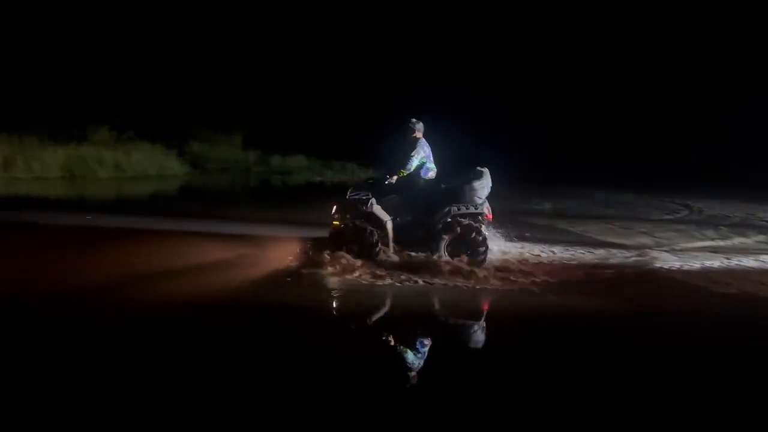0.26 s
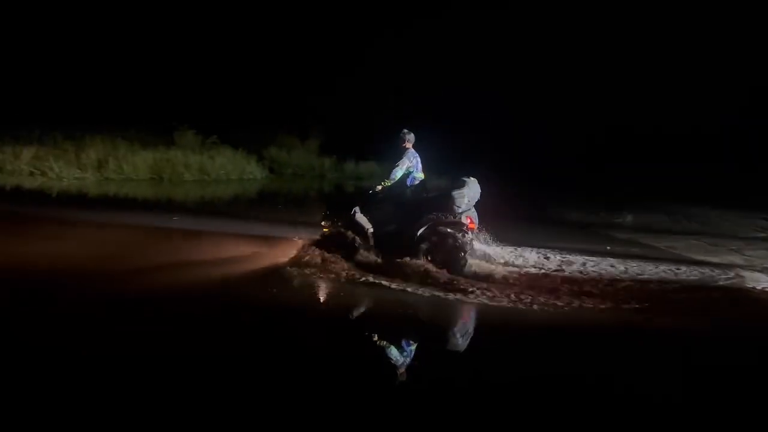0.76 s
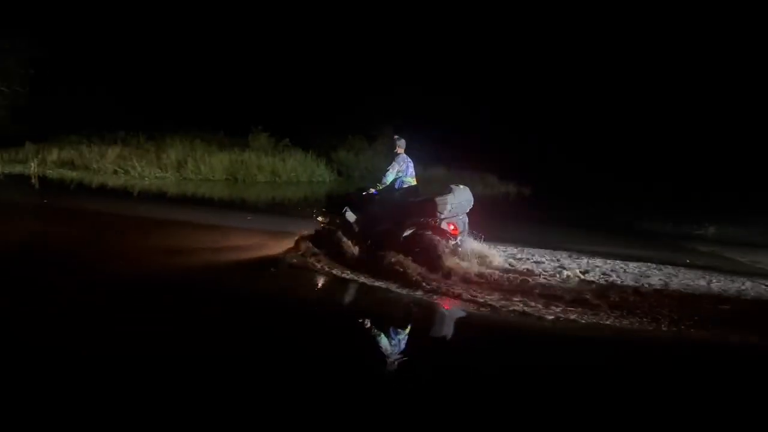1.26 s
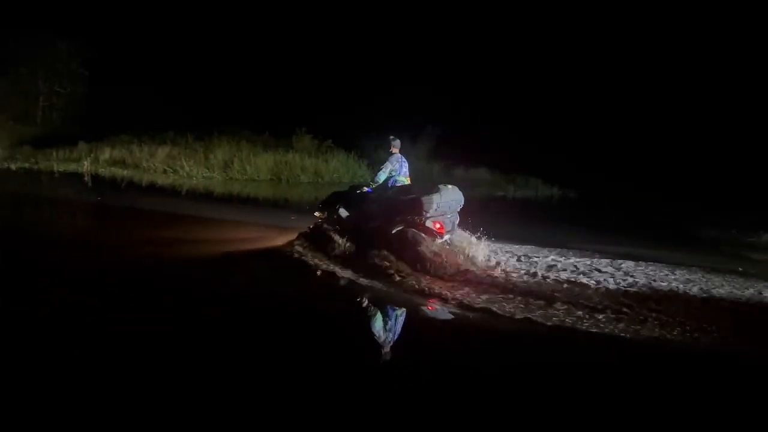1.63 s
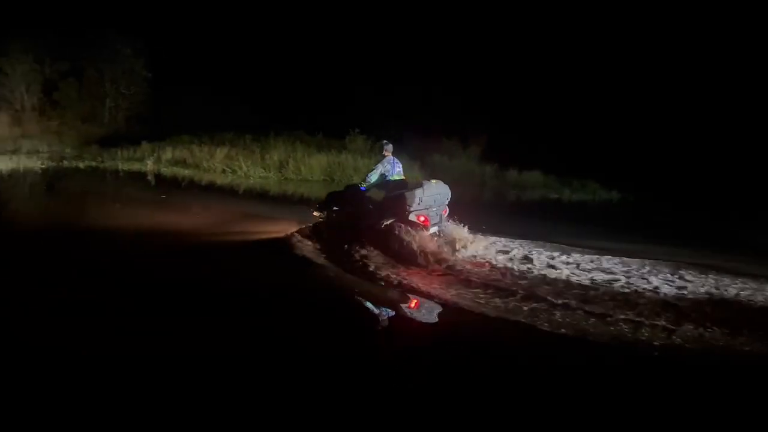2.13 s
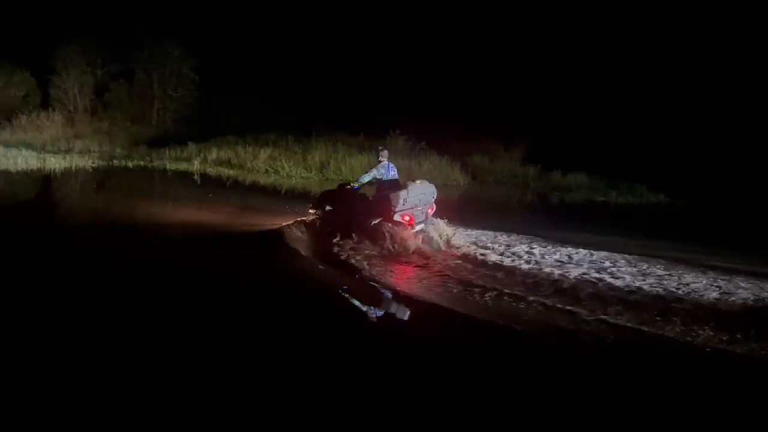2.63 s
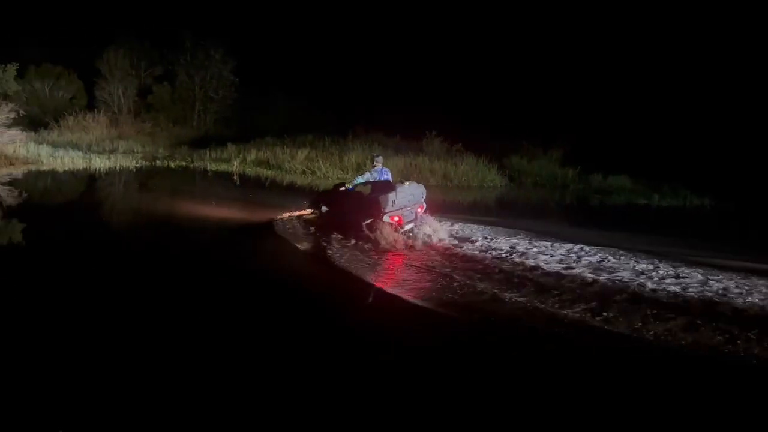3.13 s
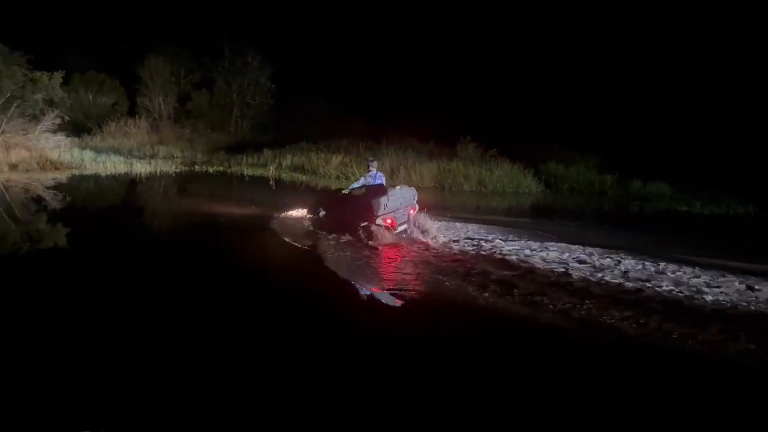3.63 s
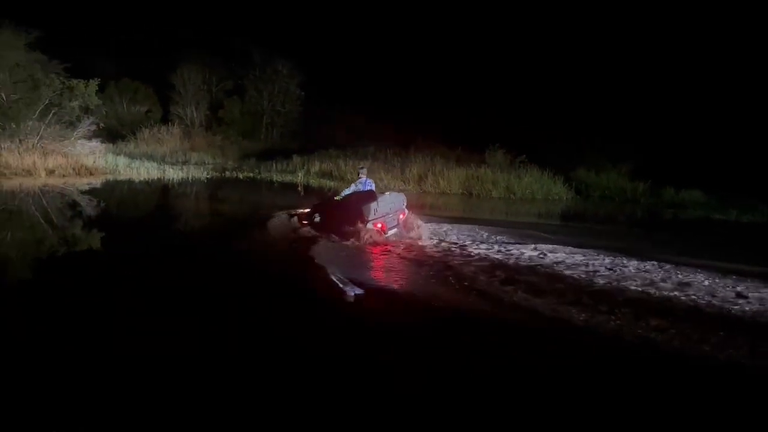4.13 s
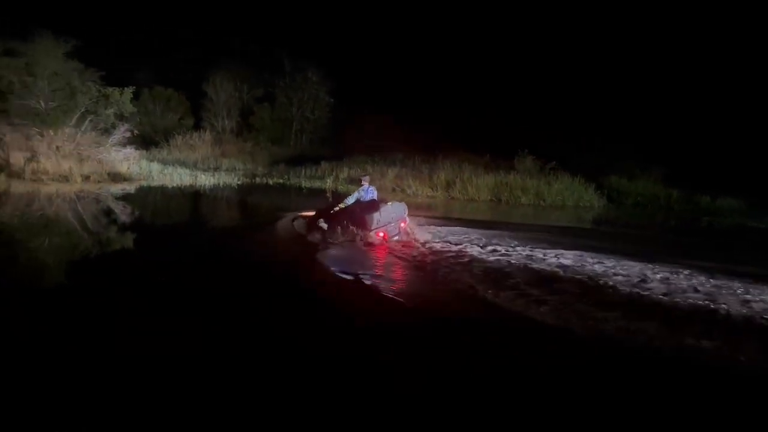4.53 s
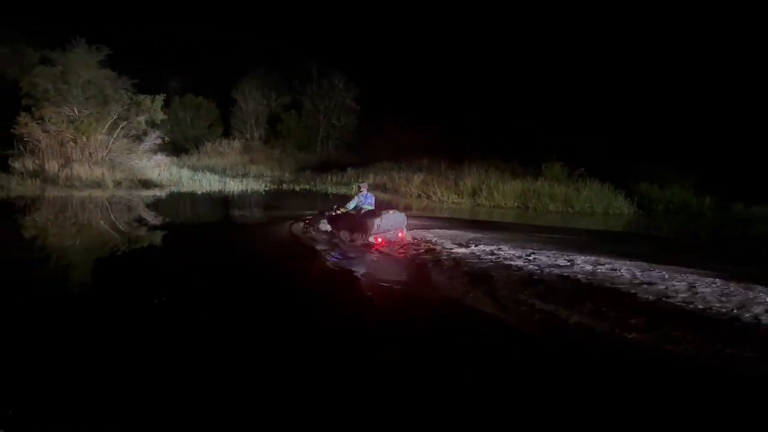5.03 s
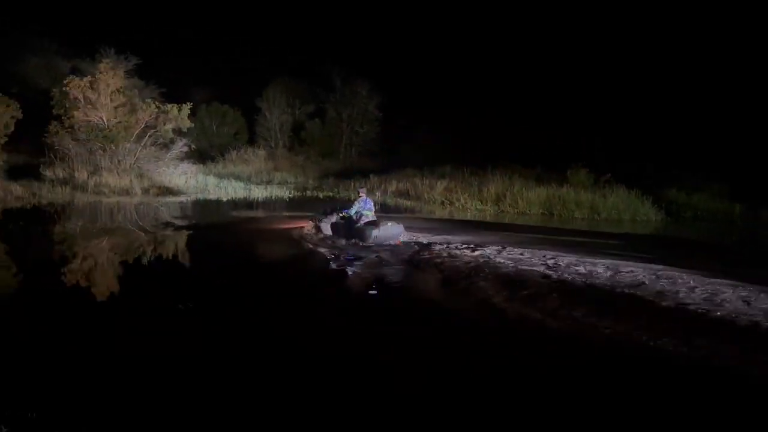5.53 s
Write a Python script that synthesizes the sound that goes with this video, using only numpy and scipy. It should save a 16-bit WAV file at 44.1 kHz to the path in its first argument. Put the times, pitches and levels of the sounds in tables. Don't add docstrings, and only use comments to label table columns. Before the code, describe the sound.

A single-cylinder quad bike throbs and churns through shallow pond water at night, turns away, revs up and fades into the distance.

```python
import sys
import numpy as np
from scipy import signal
from scipy.fft import rfft, irfft
from scipy.io import wavfile
from scipy.ndimage import uniform_filter1d

SR = 44100
rng = np.random.default_rng(int(sys.argv[2]) if len(sys.argv) > 2 else 0)


def invert_db(x):
    u = np.asarray(x, float) / 20
    return 10 ** u


def dump_mix(stems):
    frames = np.atleast_2d(stems).T
    limited = np.clip(frames, -1, 1)
    pcm = np.round(limited * 32767).astype(np.int16)
    wavfile.write(sys.argv[1], SR, pcm)


N = 254280
T = np.arange(N) / SR
STRIDE = 8


def read(points, hz):
    f, value = np.transpose(points)
    return np.interp(np.log(hz + 1), np.log(f + 1), value)


def curves(rows):
    s, *columns = np.transpose(rows)
    return [np.interp(T, s, c) for c in columns]


def evened(x):
    return x / np.sqrt(np.mean(x ** 2) + 1e-20)


def drift(top_hz, at=T):
    t = T[::64]
    slow = 0
    for f in np.geomspace(top_hz / 8, top_hz, 16):
        slow = slow + np.sin(2 * np.pi * (f * t + rng.random())) / np.sqrt(f)
    return np.interp(at, t, evened(slow))


def wash(spectrum, lo_hz, hi_hz, patchy_db, gust_db):
    frames, hz = N // 128 + 5, np.fft.rfftfreq(512, 1 / SR)
    a, b, c, d, patches = rng.standard_normal((frames, len(hz), 5)).T
    patches = uniform_filter1d(patches, size=8, axis=0)
    patches = evened(uniform_filter1d(patches, size=30, axis=1))
    gusts = evened(uniform_filter1d(rng.standard_normal(frames), size=24))
    z = np.array([a + 1j * b, c + 1j * d]) * invert_db(patchy_db * patches + gust_db * gusts)
    white = rfft(signal.istft(z, nperseg=512, noverlap=384)[1][:, :N])
    hz = np.fft.rfftfreq(N, 1 / SR)
    shaped = white * invert_db(read(spectrum, hz))
    inside = irfft(shaped[0] * (hz > lo_hz) * (hz < hi_hz), N)
    return irfft(shaped, N) / inside.std()


def order(turns, k, db, waver_db, waver_rad):
    at = T[::STRIDE]
    phase = 2 * np.pi * (k * turns + rng.random()) + waver_rad * drift(top_hz=9.0, at=at)
    strength = invert_db(db + waver_db * drift(top_hz=14.0, at=at))
    return np.sqrt(2) * strength * np.cos(phase)


def night():
    # (frequency [Hz], level [dB per Hz])
    night_spectrum = [(200, -21), (600, 1), (1200, -0.5), (2000, -10), (4000, -28.5), (9500, -31.5),
                      (11100, -10), (12000, -29.5)]
    lap = wash(night_spectrum, 400, 1500, patchy_db=1.3, gust_db=0.0)[0]
    return invert_db(-43.5) * lap * np.array([[1], [-1]])


def insects():
    whistle_hz, whistle_db = 6080, -57.5
    pole = np.exp(-np.pi * 260 / SR)
    sides = []
    for side_db in (1.5, -1.5):
        noise = rng.standard_normal(N) + 1j * rng.standard_normal(N)
        band = signal.lfilter([1], np.convolve([1, -pole], [1, -pole]), noise)
        pitch_hz = whistle_hz + 60 * drift(top_hz=13.0)
        carrier = np.exp(2j * np.pi * np.cumsum(pitch_hz) / SR)
        throb = invert_db(whistle_db + side_db + 2.0 * drift(top_hz=18.0))
        sides.append(throb * evened((band * carrier).real))
    return np.array(sides)


def idler():
    idle_hz = 12.6
    # (order [multiple of the turning rate], level [dB])
    idle_orders = [(4, -46.5), (5, -48.5), (6, -35.5), (7, -32), (8, -40.5), (9, -44.5), (10, -37),
                   (11, -61.5)]
    turns = np.cumsum(idle_hz * (1 + 0.0049 * drift(top_hz=1.433)))[::STRIDE] / SR
    engine = sum(order(turns, k, db, waver_db=2.5, waver_rad=0.22) for k, db in idle_orders)
    return signal.resample_poly(engine, STRIDE, 1)[:N]


def pipe_hiss(turns):
    # (frequency [Hz], level [dB per Hz])
    hiss_spectrum = [(3500, -27), (5000, -10), (6000, 3.5), (6900, -2.5), (8200, 4.5), (9300, -5),
                     (10600, 2), (11400, -10), (11900, -8.5)]
    beam_s, rise_s, hold_s = 4.03, 0.81, 0.12
    side_db, beam_db, gone_db_per_s = -52, 9.5, 13.5
    beam = np.exp(-(np.minimum(T - beam_s, 0) / rise_s) ** 2)
    hiss_db = side_db + beam_db * beam - gone_db_per_s * np.maximum(T - beam_s - hold_s, 0)
    hiss = invert_db(hiss_db - 4.0) * wash(hiss_spectrum, 7700, 9500, patchy_db=1.5, gust_db=1.6)
    puff = np.exp(1.0 * np.cos(2 * np.pi * (turns + 0.17)))
    load = np.clip(0.15 + beam, 0.05, 1)
    return hiss, hiss * 0.29 * load * (puff / puff.mean() - 1)


def water(turns):
    # (time [s], distance [m])
    bike_distance = [
        (0, 10.1),
        (1.2, 9.6),
        (2.4, 12.1),
        (3.9, 17.8),
        (4.5, 21),
        (5.0, 32),
        (5.77, 31.3),
    ]
    # (frequency [Hz], level [dB per Hz])
    rumble_spectrum = [(35, -40), (50, -12), (62, -0.5), (100, -3), (180, -4.5), (260, -12), (400, -11),
                       (520, -27.5), (700, -62)]
    churn_spectrum = [(300, -12.5), (480, -12), (620, -1), (750, -0.5), (1000, 0.5), (1200, -7.5),
                      (1450, -5), (1800, -31.5), (3000, -45)]
    spray_spectrum = [(600, -3.5), (1000, 6), (1300, 0), (1900, 0), (2300, 4), (2700, 0), (3500, 0.5),
                      (5000, -5.5), (7000, -10.5), (10500, -14), (12000, -18)]
    doublings = np.log2(curves(bike_distance)[0] / 10)
    rumble_gain = invert_db(-35.5 - 0.5 * doublings)
    churn_gain = invert_db(-34.5 - 4.5 * doublings)
    spray_gain = invert_db(-38.5 - 7 * doublings)
    rumble = rumble_gain * wash(rumble_spectrum, 300, 450, patchy_db=0.9, gust_db=1.5)
    churn = churn_gain * wash(churn_spectrum, 520, 1500, patchy_db=2.0, gust_db=-0.4)
    spray = spray_gain * wash(spray_spectrum, 2155, 3530, patchy_db=1.03, gust_db=0.31)
    hiss, puffs = pipe_hiss(turns)
    slosh = invert_db(0.3 * drift(top_hz=12.0))
    return rumble + churn + (spray + hiss) * slosh + puffs


def gulped():
    # (time [s], half length [s], change [dB])
    pipe_gulps = [
        (4.602, .03, -14.5),
        (4.743, .04, -8.5),
        (4.84, 0.057, 4),
    ]
    return sum(db * np.exp(-((T - s) / half) ** 2) for s, half, db in pipe_gulps)


def exhaust(rate):
    # (order [multiple of the firing rate], level [dB])
    side_on_orders = [(1, -19.5), (2, -9.5), (3, -10.5), (4, -9.5), (5, -0.5), (6, -10), (7, -9), (8, -7),
                      (9, -23.5), (10, -15), (11, -24.5), (12, -24.5), (13, -26), (14, -30.5), (15, -26),
                      (16, -31), (17, -31.5), (18, -37), (19, -39), (20, -45.5), (21, -39), (22, -33.5),
                      (23, -35.5), (24, -36.5), (25, -34), (26, -27.5)]
    behind_orders = [(1, -18), (2, -3.5), (3, -3.5), (4, -5.5), (5, -2), (6, -3.5), (7, -12.5), (8, -10),
                     (9, -12), (10, -14), (11, -14.5), (12, -20), (13, -20), (14, -24), (15, -29),
                     (16, -30), (17, -42.5), (18, -35), (19, -25.5), (20, -25.5), (21, -30.5), (22, -33),
                     (23, -27.5), (24, -33), (25, -29.5), (26, -34.5)]
    far_orders = [(1, -12.5), (2, 3), (3, 3), (4, -14.5), (5, -3.5), (6, -2), (7, -17), (8, -22.5),
                  (9, -24.5), (10, -21), (11, -15.5), (12, -15.5), (13, -24.5), (14, -20.5), (15, -32),
                  (16, -21), (17, -17), (18, -23.5), (19, -24.5), (20, -22.5), (21, -23), (22, -26),
                  (23, -34), (24, -32), (25, -35), (26, -28.5)]
    # (time [s], heading [0 side-on, 1 from behind, 2 far off], level [dB])
    bike_turn = [(0, 0.0072, -19), (1.0, 0.0085, -18), (1.25, 0.15, -20), (1.5, 0.011, -17.5),
                 (2.2, 0.024, -18), (2.6, 0.023, -19), (3.1, 0.39, -20), (3.6, 0.98, -22.5),
                 (4.1, 0.82, -20.5), (4.55, 1.2, -20.5), (4.9, 0.89, -22.5), (5.15, 1, -25.5),
                 (5.28, 2.3, -28.5), (5.77, 1.8, -31.5)]
    ease_s, ease_ramp_s, ease_db, thud_order = 4.35, 0.26, -7.5, 4.64
    gulp_order, spared_order = 3.3, 9.2
    turns = np.cumsum(rate) / SR
    eased_db = ease_db * (1 + np.tanh((T - ease_s) / ease_ramp_s)) / 2
    controls = np.array([*curves(bike_turn), gulped(), eased_db])
    heading, pipe_db, gulp_db, eased_db = controls[:, ::STRIDE]
    away, far = np.clip(heading, 0, 1), np.clip(heading - 1, 0, 1)
    pipe = 0
    for (k, side), (_, behind), (_, coasting) in zip(side_on_orders, behind_orders, far_orders):
        db = pipe_db + side + away * (behind - side) + far * (coasting - behind)
        db = db + eased_db / (1 + (k / thud_order) ** 10)
        db = db + gulp_db / (1 + (gulp_order / k) ** 4 + (k / spared_order) ** 8)
        waver_db = 0.5 + 0.08 * k + 0.6 * away
        pipe = pipe + order(turns[::STRIDE], k, db, waver_db=waver_db, waver_rad=0.03 * k)
    return turns, signal.resample_poly(pipe, STRIDE, 1)[:N]


def ports(direct, scattered):
    # (delay [s], level [dB], band [0 throws back bass and middle, 1 treble])
    wall_echoes = [
        (.00137, -7.5, 0.3),
        (.001707, -4, 0.9),
    ]
    # (frequency [Hz], left minus right [dB])
    port_tilt = [(60, 0), (110, -1), (190, -1.0), (330, -1), (580, 1.5), (1020, -1.0), (1790, -1.0),
                 (3150, -3.5), (5540, -0.5), (9760, -1.5)]
    # (frequency [Hz], phase by which the left port leads [rad])
    port_lead = [(900, 0), (1300, -.6), (1900, -.6), (2200, 0), (3000, 1.5), (4200, 3.1), (5000, 3.3),
                 (5400, 5.6), (6400, 6.9), (6800, 9.3), (7400, 9.8), (7700, 12.4), (9100, 12.8),
                 (10000, 15.7)]
    # (frequency [Hz], scattered sound [dB])
    diffuse_share = [(30, -26), (60, -10.5), (150, -5), (300, -20), (600, -9.5), (1200, -13), (2000, -8),
                     (3000, -4), (4400, -5), (6000, -1.5), (8200, -3.5), (9700, -2.5), (10350, -7.5),
                     (10600, -17.5)]
    hz = np.fft.rfftfreq(N, 1 / SR)
    treble = 1 / (1 + (4600 / (hz + 1)) ** 6)
    echo = 1
    for s, db, high in wall_echoes:
        echo = echo + invert_db(db) * abs(1 - high - treble) * np.exp(-2j * np.pi * hz * s)
    half = invert_db(read(port_tilt, hz) / 2) * np.exp(0.5j * read(port_lead, hz))
    pair = np.array([half, 1 / half])
    loose = invert_db(read(diffuse_share, hz)) * rfft(scattered) * np.array([[1], [-1]])
    return irfft(pair * (echo * rfft(direct) + loose), N) * invert_db(-2.0)


def scene():
    # (time [s], firing rate [firings per s])
    firing_rate = [(0.0, 27.8), (0.63, 27.3), (0.83, 27.3), (1.22, 28.3), (1.4, 28.4), (1.51, 27.9),
                   (2.09, 27.3), (2.81, 28.0), (2.95, 27.7), (3.42, 28.5), (3.87, 30.7), (4.35, 32.3),
                   (4.46, 33.1), (5.39, 37.0), (5.54, 38.3), (5.77, 38.7)]
    # (time [s], scattered share [dB])
    wake_spread = [
        (0, 2.5),
        (1.5, 1),
        (3, 1),
        (5.77, -0.5),
    ]
    turns, pipe = exhaust(*curves(firing_rate))
    wet, wet_scattered = water(turns)
    direct = pipe + idler() + wet
    scattered = wet_scattered * invert_db(*curves(wake_spread))
    return ports(direct, scattered) + insects() + night()


def top_cut(x):
    return signal.sosfilt(signal.butter(12, 11900, fs=SR, output="sos"), x)


def record(dry):
    bass_cut = signal.butter(3, 44, "high", fs=SR, output="sos")
    mix = signal.sosfilt(bass_cut, dry)
    return top_cut(mix)


dry = scene()
out = record(dry)
dump_mix(out)
```